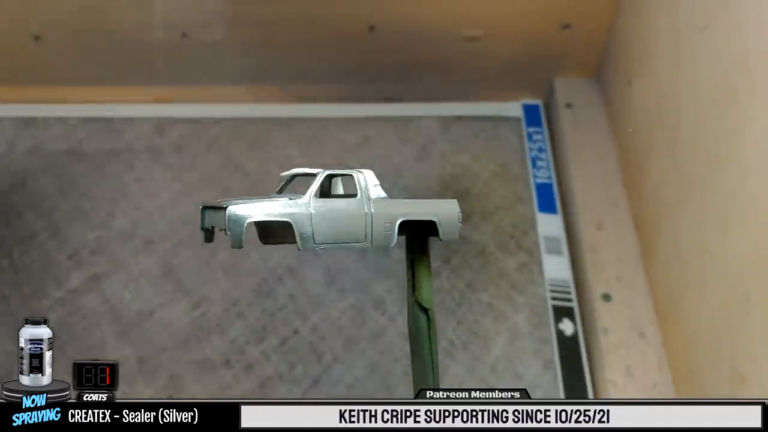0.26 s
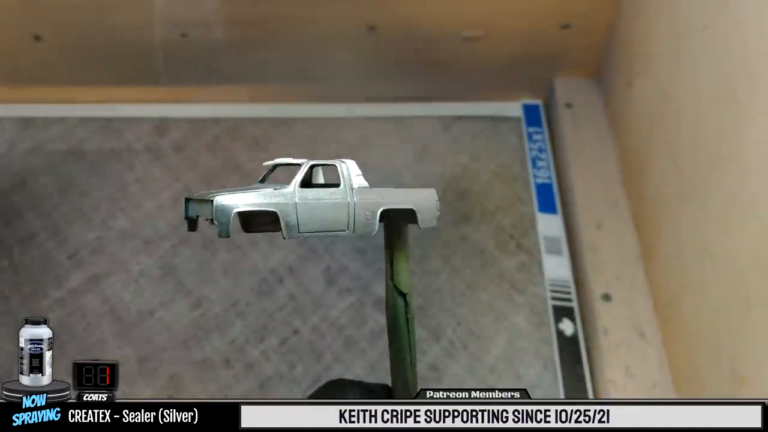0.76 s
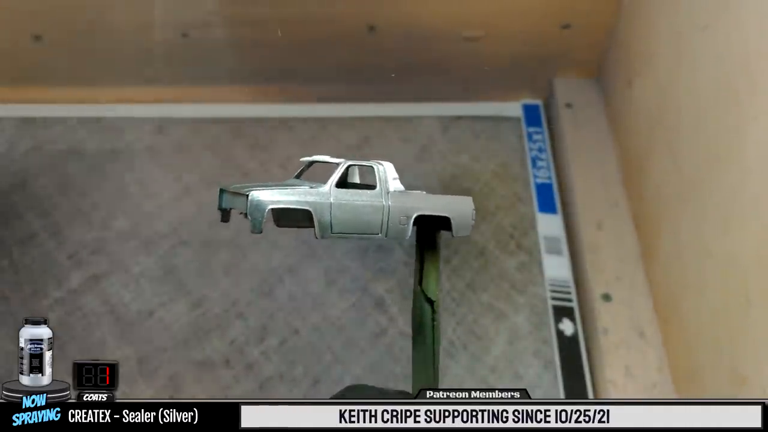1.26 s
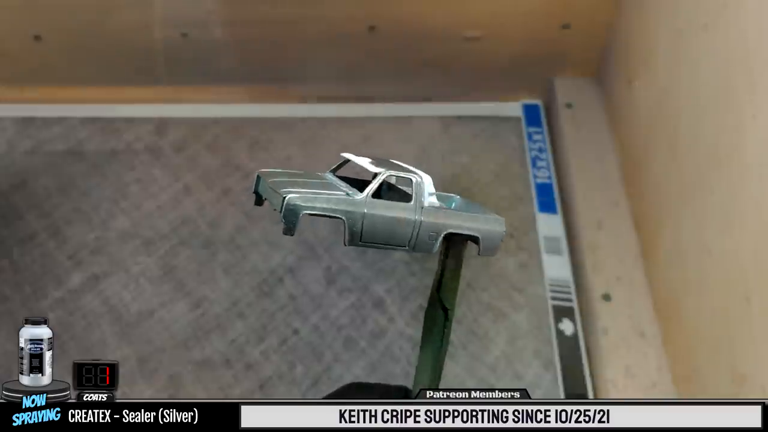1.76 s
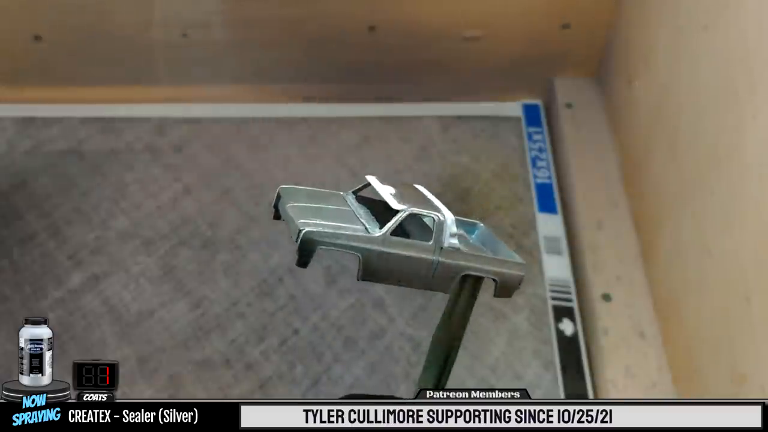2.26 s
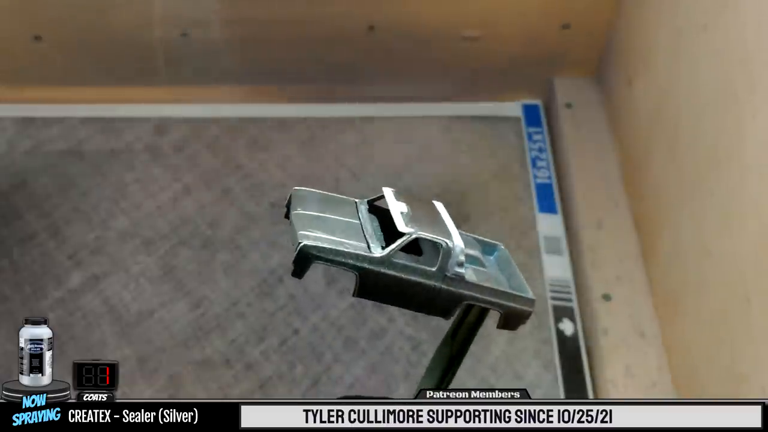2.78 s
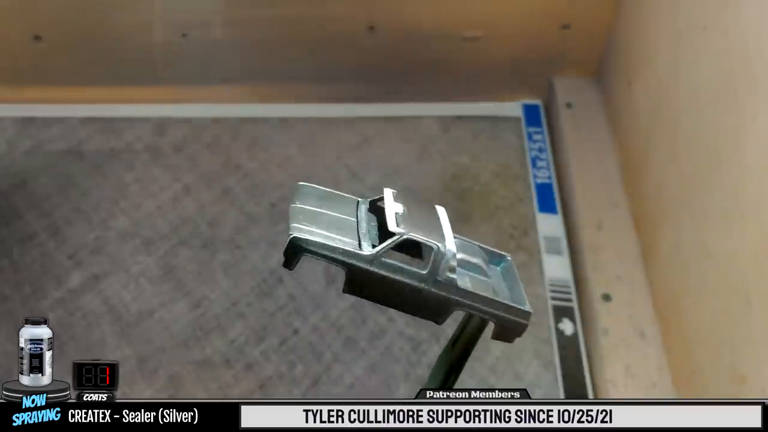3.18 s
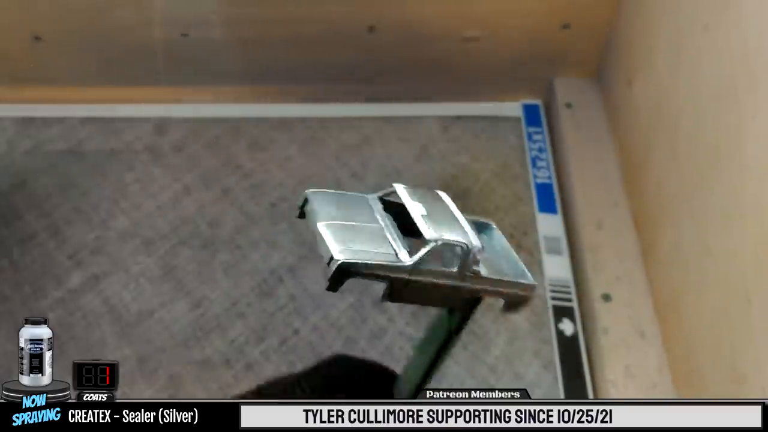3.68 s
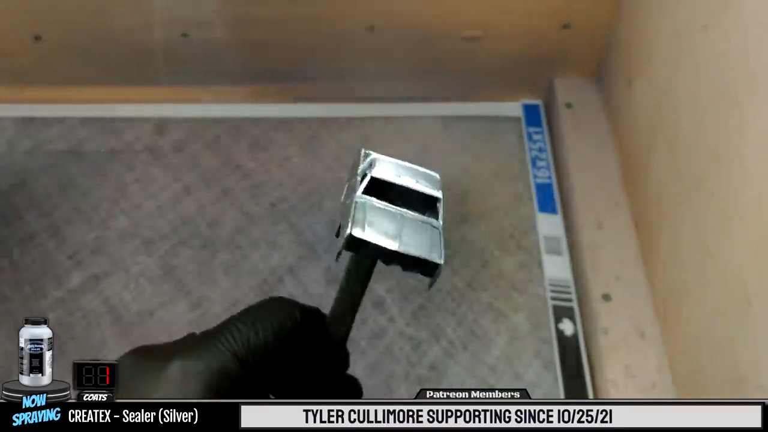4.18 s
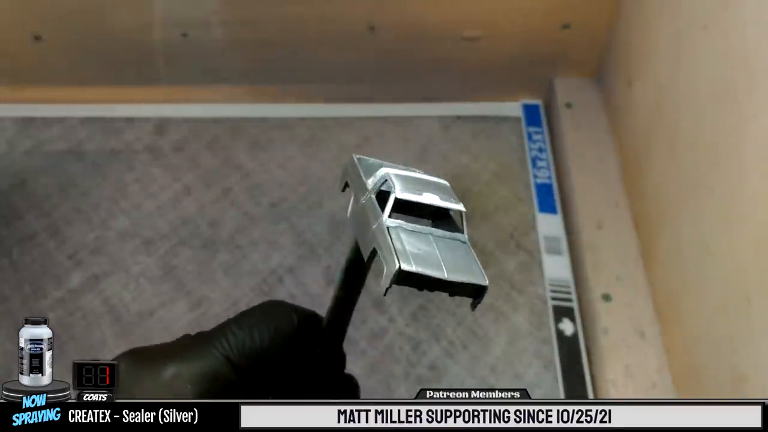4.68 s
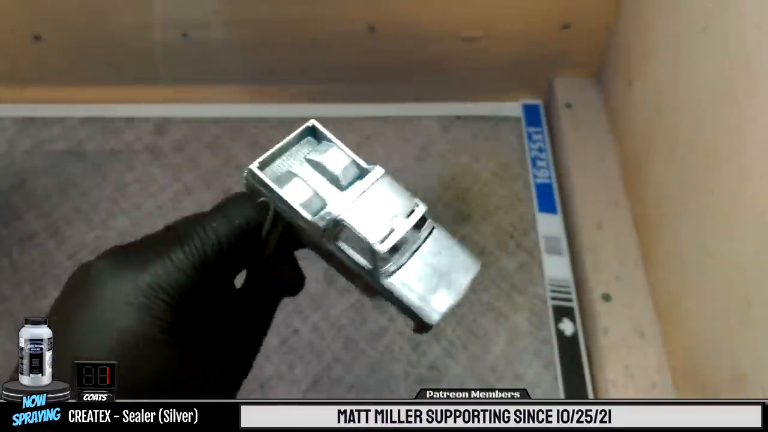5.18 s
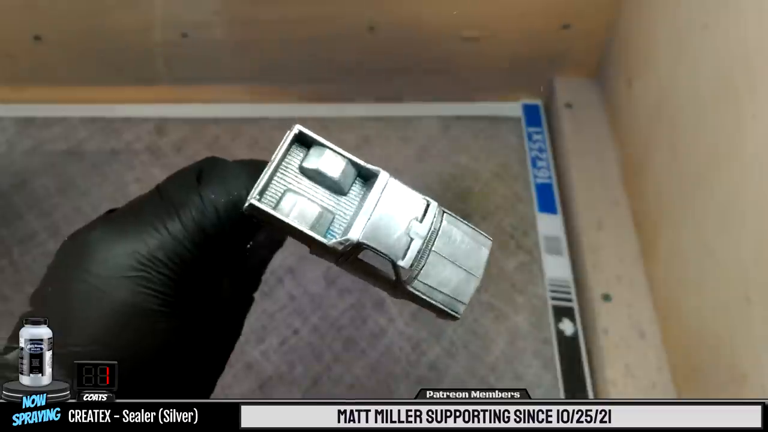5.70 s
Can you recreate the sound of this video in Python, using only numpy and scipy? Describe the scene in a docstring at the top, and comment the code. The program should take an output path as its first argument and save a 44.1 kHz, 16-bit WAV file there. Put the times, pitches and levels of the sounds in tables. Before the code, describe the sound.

An airbrush hisses in sharp, bright bursts that swell and ease with each pass, over the steady low hum of an extractor fan.

```python
"""An airbrush sprays a small model in a plywood booth while an extractor fan runs, heard by one close microphone.
The jet is on at the start and sounds in four bursts, parted by short gaps; the last runs past the end.
Within each burst, filtered noise for the jet and its impact swells and eases with each pass of the hand.
Short echoes and a brief booth tail colour it. Throughout, the fan adds sine tones for hum and whine,
and filtered noise for the air drawn through it and through its filter."""
import sys
import numpy as np
from scipy import signal
from scipy.fft import rfft, irfft
from scipy.io import wavfile
from scipy.ndimage import map_coordinates

SR = 44100
rng = np.random.default_rng(int(sys.argv[2]) if len(sys.argv) > 2 else 0)


def dump_mix(stems):
    """Bounce the given channels to the path in sys.argv[1] as a 16-bit WAV at rate SR."""
    frames = np.atleast_2d(stems).T  # one column per channel
    limited = np.clip(frames, -1, 1)  # hard clip at full scale
    pcm = np.round(limited * 32767).astype(np.int16)
    wavfile.write(sys.argv[1], SR, pcm)


N = 261954
TIME = np.arange(N) / SR  # s
BINS = np.fft.rfftfreq(N, 1 / SR)  # Hz


def from_db(db):
    """Decibel law: amplitude ratio of a level in dB."""
    return 10 ** (np.asarray(db) / 20)


def unit(x):
    """Power normalisation: scales to rms 1."""
    return x / np.sqrt(np.mean(x ** 2) + 1e-20)


def contour(points):
    """Spectral envelope: gain at each frequency, from points joined in dB on a log axis."""
    hz, db = np.transpose(points)
    return from_db(np.interp(np.log(BINS + 1), np.log(hz), db))


def resonances(peaks):
    """Resonance: gain that rises above 1 around each peak."""
    gain = 1
    for hz, width, db in peaks:
        detuning = 2 * (BINS - hz) / width
        gain = gain + (from_db(db) - 1) / (1 + detuning ** 2)
    return gain


def noise(gain):
    """Turbulence as a random process: white noise shaped by a spectrum, rms 1."""
    white = rng.standard_normal(N)
    return unit(irfft(rfft(white) * gain, N))


def drift(rate_hz):
    """Low-frequency random fluctuation: slow wandering about zero, rms 1."""
    return noise(np.exp(-.5 * (BINS / rate_hz) ** 2) * (BINS > 0))


# presses of the trigger: (air on [s], air off [s], relative level [dB])
PRESSES = [(-.1, 0.58, 0.5), (.655, 3.713, 0), (4.053, 5.076, 0.77), (5.337, 6.25, 0)]


def valve(open_s=0.0036, close_s=0.0015):
    """Flow gating: the valve eases open under the finger and springs shut."""
    flow = np.zeros(N)
    for on, off, db in PRESSES:
        opening = (1 + np.tanh((TIME - on) / (2 * open_s))) / 2
        closing = (1 + np.tanh((off - TIME) / (2 * close_s))) / 2
        flow += from_db(db) * opening * closing
    return flow


def paint(on, off, draw_s=0.12, ease_s=0.12):
    """Flow modulation: paint rises from 0 to 1 as the trigger is drawn back, holds, then falls."""
    rise = np.clip((TIME - on) / draw_s + .5, 0, 1)
    fall = np.clip((off - TIME) / ease_s + .5, 0, 1)
    return (np.sin(np.pi / 2 * rise) * np.sin(np.pi / 2 * fall)) ** 2


def midway(on, off, edge_s=0.22):
    """Position along a pass: 0 at either end, 1 well inside it."""
    return np.clip(np.minimum(TIME - on, off - TIME) / edge_s, 0, 1) ** 2


def paint_feed(flutter_db=0.48, flutter_hz=45, spit_db=0.87, spit_hz=900):
    """Random amplitude modulation: the paint feeds unevenly and tears into droplets (dB rms)."""
    flutter = flutter_db * drift(flutter_hz)
    spit = spit_db * drift(spit_hz)
    return unit(from_db(flutter + spit))


# spectrum of the free jet at the nozzle: (frequency [Hz], relative density [dB])
JET_SPECTRUM = [(200, -48), (1000, -40), (2500, -21), (4000, -8), (5200, -4.5), (6300, 0), (7300, 0.5),
                (8300, 4), (9200, 1), (10500, -0.5), (13300, -2), (14400, 2), (15200, 3), (15800, 1.5)]
# narrow air resonances in the jet and its impact: (frequency [Hz], width [Hz], lift [dB])
JET_CAVITIES = [(3050, 76, 4), (3316, 100, 5)]
# passes of the hand, the trigger drawn back for paint:
# (paint on [s], paint off [s], rise of the hiss [dB], rise of the impact on the model [dB])
PASSES = [(-.3, 0.023, 5.5, 7.5), (0.2, .52, 4.5, 7.5), (0.663, 1.005, 5, 7), (1.163, 1.602, 4, 6),
          (1.76, 2.08, 5.5, 7), (2.22, 2.637, 4.9, 6), (2.8, 3.038, 5.5, 6.5), (3.135, 3.36, 5.6, 8.5),
          (3.51, 3.665, 5.5, 8), (4.05, 4.36, 4, 6), (4.493, 4.73, 4.5, 7), (4.853, 5, 4, 6.5),
          (5.354, 5.653, 5, 6.5), (5.802, 6.203, 5, 8)]


def jet(air_db=-39.5):
    """Jet mixing noise: broadband hiss that swells with the paint above its level with air alone."""
    level_db = air_db + sum(hiss_db * paint(on, off) for on, off, hiss_db, _ in PASSES)
    return from_db(level_db) * noise(contour(JET_SPECTRUM) * resonances(JET_CAVITIES))


# spectrum of the jet striking the model and the filter: (frequency [Hz], relative density [dB])
IMPACT_SPECTRUM = [(300, -13), (900, -6), (1500, -4.5), (2400, 1), (3800, -2), (6000, -2), (12000, -49)]


def impact(air_db=-55, sag_db=1.2, aim_db=0.46, aim_hz=5):
    """Impingement noise: duller, strongest at the model's edges, its level wavering with the aim."""
    level_db = air_db + aim_db * drift(aim_hz)
    for on, off, _, strike_db in PASSES:
        level_db += strike_db * paint(on, off) - sag_db * midway(on, off)
    return from_db(level_db) * noise(contour(IMPACT_SPECTRUM) * resonances(JET_CAVITIES))


# reflections from the booth walls and the model: (mean delay [s], strength relative to direct sound [ratio])
REFLECTIONS = [(.0011, 0.18), (.0025, .24), (.0039, 0.24), (.0054, 0.18)]


def walls(x, sway=0.0893, sway_hz=1.11):
    """Comb filtering: short echoes colour the hiss; the combs slide as the hand moves."""
    out = x.copy()
    for delay, strength in REFLECTIONS:
        path_s = delay * (1 + sway * drift(sway_hz))  # sway: rms fraction of the delay
        out += strength * map_coordinates(x, [(TIME - path_s) * SR], order=3)
    return out / np.sqrt(1 + sum(strength ** 2 for _, strength in REFLECTIONS))


def booth(x, wet_db=-9.5, t60=0.13, move_hz=1.86, count=6):
    """Reverberation: the box rings on briefly; the moving jet feeds a changing blend of echo paths."""
    t = np.arange(SR // 3) / SR
    decay = from_db(-60 * t / t60) * (t > .004)  # silent for the first 4 ms
    tails = rng.standard_normal((count, len(t))) * decay
    tails /= np.linalg.norm(tails, axis=1, keepdims=True)
    blend = np.array([drift(move_hz) for _ in range(count)])
    blend /= np.linalg.norm(blend, axis=0)
    echoes = signal.fftconvolve(x * blend, tails, axes=1).sum(0)[:N]
    return x + from_db(wet_db) * echoes


def airbrush():
    """Source and path: valve flow and paint feed modulate jet and impact; the booth filters them."""
    spray = valve() * paint_feed() * (jet() + impact())
    return booth(walls(spray))


def tone(hz, db, clock, waver):
    """Amplitude modulation: one machine tone whose strength wavers in the air stream."""
    strength = from_db(db) * (1 + waver * drift(5.5))
    return np.sqrt(2) * strength * np.sin(2 * np.pi * (hz * clock + rng.random()))


# magnetic hum of the motor and its beats with the shaft: (frequency [Hz], level before the hum trim [dB])
HUM_TONES = [(91.5, -56), (119.95, -36), (148.4, -65), (239.9, -67), (296.8, -52), (359.9, -62),
             (626.7, -69), (655.2, -70), (718.2, -67), (746.7, -62), (775.2, -67), (946.8, -70)]


def hum(trim_db=-0.3):
    """Magnetic excitation: mains hum of fixed pitch, every tone trimmed alike."""
    return sum(tone(hz, db + trim_db, TIME, waver=0.032) for hz, db in HUM_TONES)


SHAFT_HZ = 28.406  # nominal speed, turns per second
# fan tones: (multiple of the shaft speed [ratio], rms level before the waver [dB])
SHAFT_ORDERS = [(2, -56), (3, -55), (4, -58), (6, -64), (12, -68), (14, -65), (20, -67), (24, -66),
                (28, -59), (30, -64), (32, -66), (34, -67), (36, -65), (40, -74), (42, -77), (46, -73),
                (48, -80), (62, -70), (70, -68)]


def shaft_whine(clock):
    """Order tones: whine locked to multiples of the shaft speed."""
    return sum(tone(order * SHAFT_HZ, db, clock, waver=0.2) for order, db in SHAFT_ORDERS)


def slot_whine(clock, order=58, db=-58.7, swing_rad=1.2, throb=.17):
    """Phase and amplitude modulation: whine of the rotor's slots swings twice in each turn."""
    angle = 2 * np.pi * (SHAFT_HZ * clock + rng.random())
    strength = from_db(db) * (1 + throb * np.cos(2 * angle))
    return np.sqrt(2) * strength * np.sin(order * angle + swing_rad * np.sin(2 * angle))


# spectrum of air drawn through the fan: (frequency [Hz], relative density [dB])
RUMBLE_SPECTRUM = [(15, -46), (28, -32), (35, -16), (44, -19), (60, -6.5), (95, -4.5), (125, 3.5),
                   (165, -6), (210, -9.5), (290, -3.5), (350, -3), (410, -9), (480, -5.5), (560, -13.5),
                   (900, -35), (3000, -71)]


def rumble(db=-48.5):
    """Flow turbulence: low broadband noise of air drawn through the fan."""
    return from_db(db) * noise(contour(RUMBLE_SPECTRUM))


def boom(db=-59, hz=284, width_hz=18):
    """Cavity resonance: moving air booms in the housing as narrow-band noise."""
    return from_db(db) * noise(1 / (1 + (2 * (BINS - hz) / width_hz) ** 2))


# spectrum of air drawn through the filter: (frequency [Hz], relative density [dB])
RUSH_SPECTRUM = [(100, -28), (520, -11.5), (620, 0.5), (800, -1.5), (950, -3.5), (1100, -9.5), (1450, -9.5),
                 (1650, -10.5), (2300, -12), (3100, -15.5), (3700, -19.5), (6100, -23), (8500, -23),
                 (9700, -33), (12500, -39), (15000, -52)]
# narrow peaks in the fan's hiss: (frequency [Hz], width [Hz], lift [dB])
RUSH_PEAKS = [(4330, 140, 5.5), (6020, 270, 10.5), (7500, 200, 3)]


def rush(db=-54.0):
    """Flow noise: air hisses through the filter, with narrow spectral peaks."""
    return from_db(db) * noise(contour(RUSH_SPECTRUM) * resonances(RUSH_PEAKS))


def fan(wander=0.00017):
    """Superposition: hum, tones on one wandering shaft clock, and moving air."""
    speed = 1 + wander * drift(0.92)  # relative to nominal
    shaft_clock = np.cumsum(speed) / SR
    tones = hum() + shaft_whine(shaft_clock) + slot_whine(shaft_clock)
    return tones + rumble() + boom() + rush()


def scene():
    """Superposition at one point: a single microphone feeds both channels."""
    return np.tile(airbrush() + fan(), (2, 1))


def record(dry, edge_hz=15790):
    """Linear-phase low-pass filtering: the recorder's band limit."""
    lowpass = signal.firwin(1023, edge_hz, window=("kaiser", 9), fs=SR)
    return signal.oaconvolve(dry, lowpass[None], "same")


dry = scene()
out = record(dry)
dump_mix(out)
```